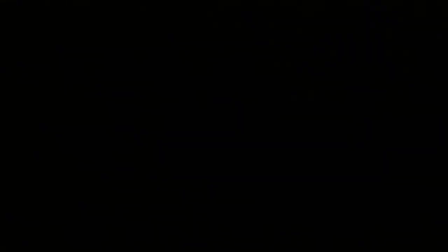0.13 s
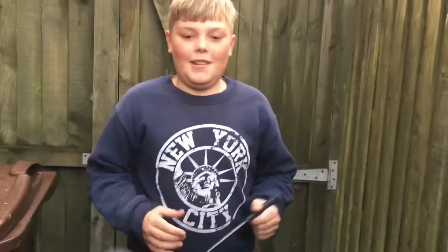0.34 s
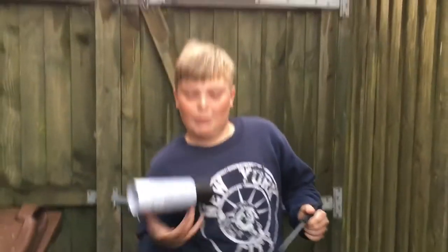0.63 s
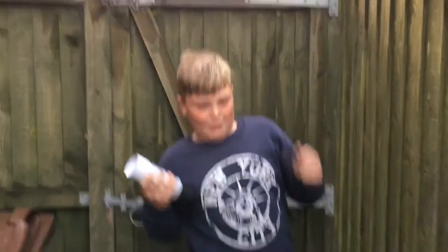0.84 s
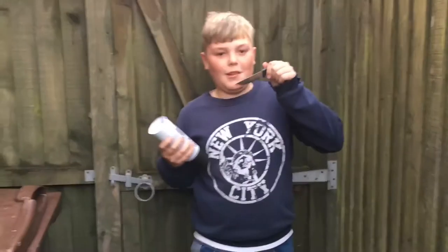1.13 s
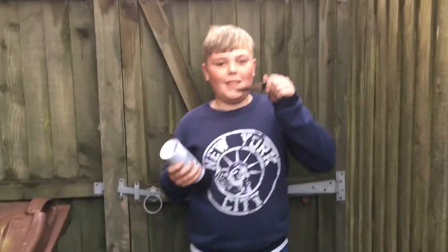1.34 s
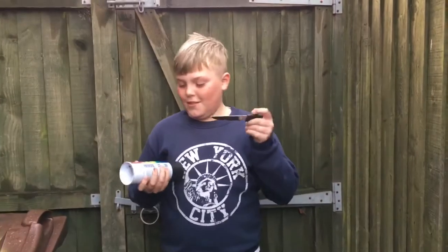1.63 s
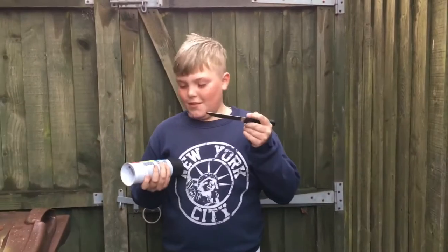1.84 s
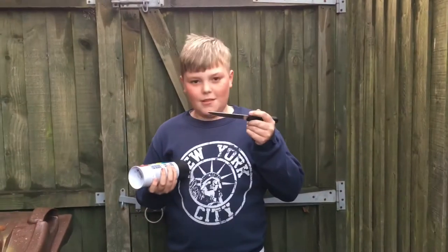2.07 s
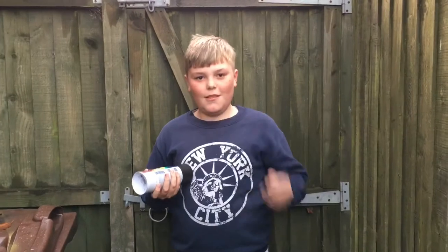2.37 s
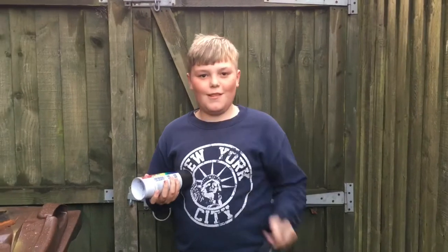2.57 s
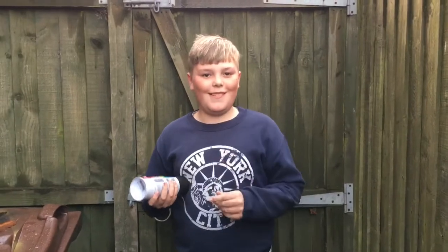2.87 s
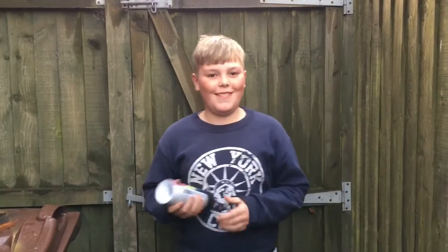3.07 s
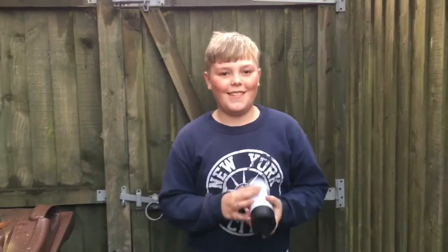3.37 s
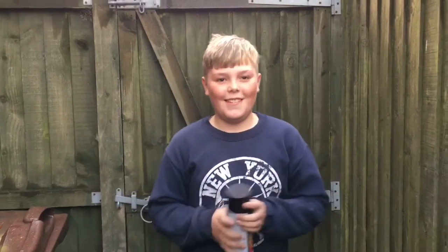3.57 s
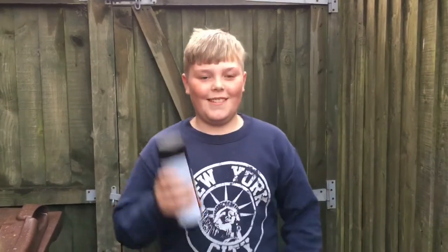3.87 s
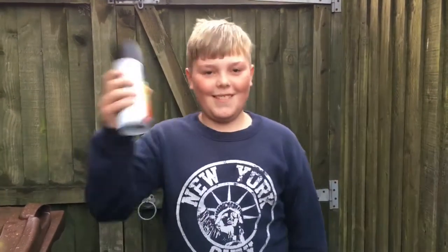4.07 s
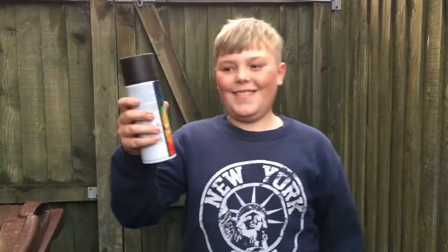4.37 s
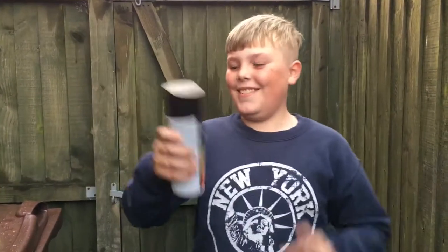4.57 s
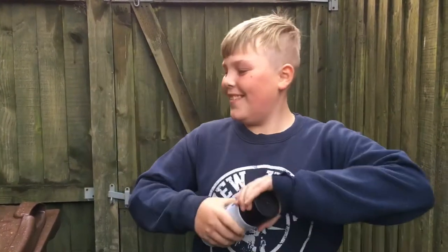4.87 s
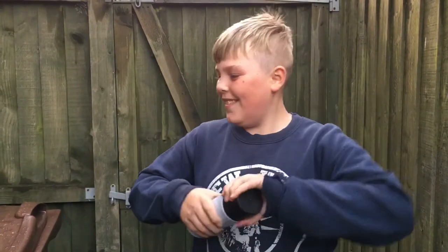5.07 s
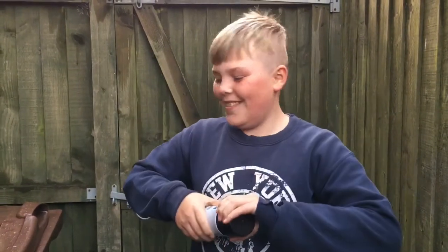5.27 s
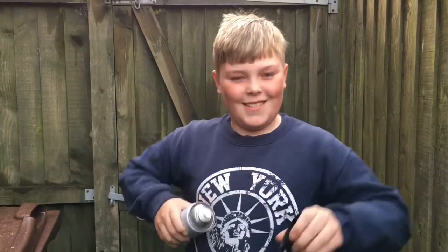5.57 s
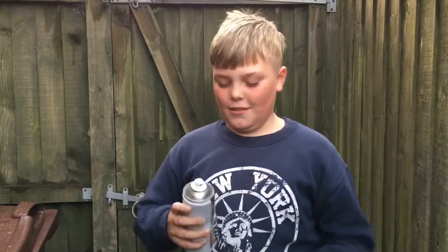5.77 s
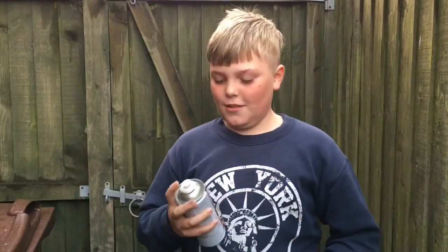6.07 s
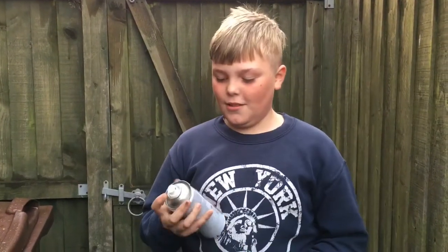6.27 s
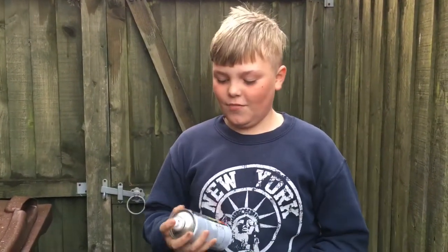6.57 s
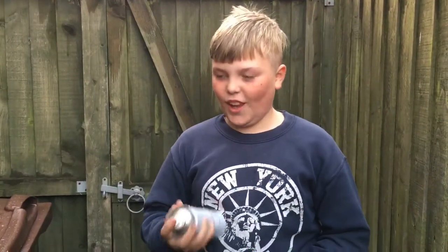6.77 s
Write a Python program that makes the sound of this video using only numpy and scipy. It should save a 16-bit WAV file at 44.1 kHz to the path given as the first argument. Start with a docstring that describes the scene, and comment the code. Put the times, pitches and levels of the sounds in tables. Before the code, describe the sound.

A soft thump on the microphone and faint hiss open, then a steel spray can clacks sharply close by and settles to small ticks. After a quiet gap with wind thuds, a hollow knock rings and the can is shaken briskly, its ball rattling brightly. The rattle thins, the plastic cap pops off, a few more metallic clicks follow, and low wind buffets the microphone in a fenced yard with distant tyre wash.

```python
"""Spray can shaken in a fenced yard

Close to the microphone, a mixing ball clacks, rolls and rustles in a steel can: cracks and tiny ticks excite its rings.
Something hollow is knocked close by and later the plastic cap pops off, each a crack with its own decaying modes.
The microphone is bumped at the start; then wind buffets it with swells of low noise.
Farther off, shaped noise makes a faint wash of air and distant tyres, under a fading hiss."""
import sys
import numpy as np
from scipy import signal
from scipy.fft import rfft, irfft, next_fast_len
from scipy.io import wavfile

SR = 44100
rng = np.random.default_rng(int(sys.argv[2]) if len(sys.argv) > 2 else 0)


def to_wav(s):
    """Save 16-bit WAV."""
    ch = np.atleast_2d(s).T  # columns
    pcm = np.round(np.clip(ch, -1, 1) * 32767)  # PCM
    wavfile.write(sys.argv[1], SR, pcm.astype(np.int16))


N = 304545
TIME = np.arange(N) / SR

# Tables of blows share these columns: t/s, level/dB before the object's tone, favoured f/Hz,
# tail against crack/dB, body/dB. Tables of modes: f/Hz, level/dB, t60/s before the common fade.
# Bodies: f/Hz, width/Hz, level/dB. Tones, one row per band: level/dB, share of the body dB.

# single clacks and ticks of the ball, loud and faint; the body is high on the thin side wall,
# low on the ends (blow columns)
CLACKS = [(0.387, -43, 3880, -1, -8.5), (0.4477, -51.5, 2360, 7, 2.5), (0.5378, -56.5, 2270, -2, 5.5),
          (0.6042, -53.5, 2420, 4, -0.5), (0.7168, -37, 3830, -6, -4.5), (0.7472, -21, 4410, -1, -9),
          (0.766, -35, 4480, 0, -13), (0.7761, -32, 5940, 3, -16), (0.8008, -33, 3970, 4, -14),
          (0.8115, -38, 4030, -12, -8), (0.9101, -37.5, 5850, -2, -9.5), (0.9449, -39, 4360, -3, -11),
          (0.9597, -41.5, 4300, -5, -3), (0.973, -34, 4370, -3.5, -11.5), (0.9948, -41.5, 5740, 5, -3),
          (1.0623, -48, 2100, 3, 2.5), (1.1235, -47, 3820, 3, -2), (1.1546, -41.5, 10600, 2, -4.5),
          (1.2102, -43, 4000, -4, -3.5), (1.2367, -44, 3940, -10, -6.5), (1.4128, -47, 3850, 0, -2.5),
          (1.541, -39, 4570, 3, -6), (1.619, -49.5, 3980, -3, -6), (2.831, -46, 9840, 2, -7),
          (2.8653, -47.5, 4260, 2, -7), (3.0359, -54.5, 4100, 7, -12), (3.134, -45.5, 4340, 9, -11),
          (3.4138, -46.5, 4000, 0, 3.5), (3.514, -41, 7000, 5, 5.5), (3.532, -35.5, 4225, -1.5, 2),
          (3.6154, -47.5, 4100, 15, 4.5), (3.6971, -27.5, 12400, -4, -6.5), (3.7495, -26, 11500, -5, -5),
          (3.8125, -33.5, 3930, -2.5, -6.5), (3.8715, -28.5, 7000, -3.5, -9), (3.9014, -22, 7550, -4, -10),
          (3.946, -35, 7140, -5, -11), (3.9898, -39.5, 3970, -3, -10), (4.023, -31.5, 3970, -4.5, -9.5),
          (4.106, -33.5, 2050, 6, 2.5), (4.1507, -44, 1640, -2, 3.5), (4.1939, -26, 4020, -3, -1.5),
          (4.2219, -26, 5820, -4.5, -10), (4.276, -35.5, 1680, 2, 2.5), (4.3142, -37.5, 1790, -4, 4),
          (4.3659, -45.5, 1740, -2, 1), (4.4207, -31, 1690, -2.5, 1), (4.4581, -29, 2520, -6, -2),
          (4.5314, -41.5, 1750, -2, -2.5), (4.5774, -38, 1780, -1, -1.5), (4.6725, -41, 7200, -4, -3),
          (4.7048, -40, 2550, 1, 0), (4.7741, -41.5, 2430, -9, 1), (4.79, -45.5, 2490, -14, 4),
          (4.811, -38.5, 7110, -3, -2.5), (4.851, -44.5, 1810, 1, 3.5), (4.8961, -39, 4550, -4, -2.5),
          (4.935, -42.5, 4560, -5, -5), (4.9817, -43, 4450, -7, -6), (5.0391, -47, 6900, 2, -4),
          (5.3287, -53.5, 2365, 0, 1), (5.491, -49.5, 2270, 0, 2), (5.517, -48.5, 1830, -5, -1),
          (5.598, -30, 7050, 4, -8.5), (5.6854, -35.5, 3922, 1.5, -4.5), (5.7898, -37.5, 7120, -9, -15)]
# short random rattles of the loose ball: start t/s, end t/s, mean level/dB before tone, body/dB
RATTLES = [(0.822, .86, -42, -5), (1.252, 1.29, -46.5, -8), (3.777, 3.8, -57, 7), (4.382, 4.41, -44.5, 0),
           (4.587, 4.65, -47.5, -7), (4.718, 4.76, -42, 1)]
# rolling, scraping and soft rustling at the can:
# t/s, length/s, level/dB before tone, ring of the shell/dB, body/dB
ROLLS = [(0.699, 0.1, -40.5, -19, -7), (.755, 0.12, -45, -27, -9), (0.938, 0.13, -49.5, -20, -0.5),
         (1.201, 0.12, -51, -21, -2), (1.443, 0.11, -58.5, -12, -4), (1.619, 0.16, -52, -25, -5),
         (2.625, .1, -61, -9, 7), (2.839, 0.091, -63.5, -3, -4), (3.137, 0.095, -53, -17, -3),
         (3.202, .2, -55, -9, 0), (3.638, 0.034, -25.5, -29, -4.5), (3.699, 0.31, -57, -10, 5.5),
         (4.668, 0.12, -51, -3, -3), (4.741, 0.071, -45, -2, -2), (4.841, 0.184, -56.5, -6, -1),
         (5.671, 0.039, -38.5, 5, -19), (5.707, 0.2, -47.5, 2, -11.5), (5.799, 0.17, -56.5, 3, -11),
         (5.899, 0.37, -60.5, 2, -4), (6.778, .1, -65, -7, -5)]
# edges of the can's tone bands: f/Hz
CAN_BANDS_HZ = [600, 1400, 3000, 8000, 16000]
# tone of the can (tone columns)
CAN_TONE = [(-9.5, 1.46), (-0.5, 1), (-1.5, 0), (-6.5, 0)]
# broad resonances of the can (body columns)
CAN_BODY = [(960, 132, 9), (1670, 130, 0), (2374, 570, 4.5), (3880, 1300, 6), (5940, 1400, 4),
            (7090, 510, 1.5), (10400, 600, -7.5), (11500, 1300, 2), (13000, 390, -10)]
# longer rings of the shell (mode columns)
CAN_MODES = [(1700, 1, 0.041), (1856, -5, 0.18), (2329, -5.5, 0.12), (4000, -20, 0.091),
             (4120, -7.5, 0.062), (4330, -4.5, 0.022), (7100, -9, .035)]
# level of the can's treble over time: t/s, level/dB
TREBLE = [(.4, 3), (.72, -2), (.95, -7), (1.15, 1.5), (1.45, -3), (3.1, 2.5), (3.65, 3.5), (4.0, -2),
          (4.2, 1), (4.9, -2), (5.6, -0.5), (5.8, -4)]

# edges of the tone bands of knock and cap: f/Hz
BLOW_BANDS_HZ = [130, 700, 1400, 3000, 8000, 16000]
# a hollow thing is tapped, then struck and settles (blow columns)
KNOCKS = [(1.3475, -49, 850, -3, 5.5), (3.4283, -17.5, 2045, 3, -2.5), (3.4362, -35, 574, 3, 16)]
# its tone (tone columns)
KNOCK_TONE = [(-0.5, 1.3), (-2, 0.85), (4.5, .5), (-3.5, .5), (-12, 0.5)]
# its broad resonances (body columns)
KNOCK_BODY = [(775, 190, -0.5), (2430, 470, 2.5), (2980, 240, -12.5)]
# rings of its hollow body (mode columns)
KNOCK_MODES = [(246, 5, 0.2), (281.7, -1, 0.29), (355, 1, 0.49), (400, 14, 0.3), (542, -13, 0.24),
               (590, -28, 0.11), (656, -3.5, 0.65), (929, 8, 0.38), (1120, 0.5, 0.48), (1333, 15, .25),
               (1900, -15, 0.62), (1943, 3.5, 0.18), (2033, -4.5, 0.37), (2210, 12, 0.19), (2365, -5, 0.4),
               (2600, -2.5, 0.59), (3270, 5, 0.96), (4300, 9, 0.42)]

# the cap snaps off the rim, then its cavity rings (blow columns)
POPS = [(5.4161, -16, 559, -5.5, 0.5), (5.4238, -25.5, 1190, -4.5, 14)]
# tone of the cap (tone columns)
CAP_TONE = [(0, 0), (-5, 1), (-16, 0.78), (-6.5, 0), (-14, 0.5)]
# broad resonances of the cap (body columns)
CAP_BODY = [(234, 130, 4), (430, 130, -2.5), (1370, 110, -7), (7800, 1700, 7), (10600, 660, -4),
            (13300, 4000, -4)]
# air and wall of the cap (mode columns)
CAP_MODES = [(322, -14, 0.076), (573, -9.5, 0.033), (630, -1.5, 0.036), (760, -16, 0.043), (966, -3, 0.12),
             (1100, 0, 0.054), (1580, -4, 0.041)]

# fingers bump the microphone (blow columns)
BUMPS = [(.0425, -27, 218, -28, 0), (.099, -46.5, 900, -17, 7), (.119, -54, 950, -34, 16.5),
         (.303, -56, 600, -29, 6)]
# edges of the housing's tone bands: f/Hz
BUMP_BANDS_HZ = [40, 150, 700, 1400, 3000, 8000]
# tone of the microphone housing (tone columns)
HOUSING_TONE = [(-5, 1), (-1.5, -0.5), (-6.5, 0.5), (-10.5, 0), (-26.5, 0)]
# broad resonances of the housing (body columns)
HOUSING_BODY = [(13000, 18000, -22), (1300, 250, -3.5)]
# ring of the housing (mode columns)
HOUSING_MODES = [(65, 0, 0.082)]

# single wind buffets, strong and weak:
# t/s, level/dB before the rumble gain, extra level of the upper (flap) band/dB
BUFFETS = [(2.024, -26, 3), (2.287, -31.5, -18), (2.79, -19, 0.5), (2.851, -17.5, -5.5), (2.887, -22, 11.5),
           (2.944, -19.5, 1.5), (3.002, -22.5, 8.5), (3.04, -25, 4), (3.185, -27, 1.5), (3.379, -28.5, 0.5),
           (3.645, -35, 12.5), (4.038, -34.5, 3), (4.426, -22.5, -1), (4.598, -29, 2.5), (5.062, -25, 3),
           (5.478, -22, -17), (5.712, -20, -1), (5.761, -22, 0.5), (6.434, -20.5, -0.5), (6.491, -20, 1),
           (6.599, -21.5, -2.5), (6.631, -21.5, 14.5), (6.688, -31, 17.5), (6.73, -32.5, 28.5),
           (6.776, -25.5, -1), (6.798, -24, 9.5), (6.822, -21, -1)]
# gusts reach the microphone: start t/s, length/s, level/dB before the eddy and rumble gains
GUSTS = [(1.895, 0.093, -40), (2.16, .2, -46.5), (2.781, .25, -28), (3.081, 0.1, -39.5), (4.42, .23, -41),
         (5.027, 0.11, -34), (5.239, .26, -29), (5.649, 0.15, -26), (5.824, 0.1, -34.5),
         (6.419, 0.1, -33.5), (6.584, 0.29, -31)]
# edges of the rumble and flap bands of an eddy: f/Hz
WIND_BANDS_HZ = [25, 250, 900]
# colour of an eddy ahead of its band levels: f/Hz, relative level/dB per Hz
EDDY = [(15, -19), (35, -8.5), (60, -5.5), (140, -3.5), (250, -7.5), (500, -23), (750, -34.5), (1200, -58),
        (2500, -67), (16000, -125)]
# light breeze between the gusts, ahead of its fade-in: t/s, level/dB
BREEZE = [(.4, -66), (.52, -48.5), (2.1, -47.5), (2.7, -49.5), (3.2, -38.5), (4.45, -53), (4.7, -42.5),
          (5.0, -53), (5.3, -36), (5.8, -32.5), (5.99, -51.5), (6.3, -41.5), (6.9, -30)]
# colour of breeze and gusts: f/Hz, relative level/dB per Hz
BREEZE_COLOUR = [(15, -33.5), (35, 0.5), (60, 4.5), (110, -5), (200, -16.5), (400, -32.5), (1000, -70.5)]

# echoes between fence and house: f/Hz, t60/s
YARD_T60 = [(200, 0.24), (1000, 0.23), (2100, 0.24), (4000, 0.15), (8000, 0.14), (15000, 0.13)]
# colour of the outdoor background: f/Hz, relative level/dB per Hz
AIR = [(59, -35.5), (100, -1.5), (335, -5.5), (634, -14), (1520, -12.5), (2080, -17), (2320, -20),
       (2470, -23), (2750, -36), (3050, -28), (3540, -34.5), (4020, -31), (5650, -40), (6560, -56),
       (16000, -60)]
# its level: t/s, level/dB
AIR_LEVEL = [(0, -56.5), (.08, -68), (.16, -78), (.365, -75), (.385, -50), (1.5, -51.5), (2.5, -51.5),
             (3.3, -52), (5.2, -48.5), (6.2, -50), (6.9, -49)]
# tyres of a far car: t/s, level/dB
TYRES = [(0, -102), (.37, -102), (.5, -61.5), (4.5, -55), (5.2, -50.5), (5.9, -56), (6.25, -49), (6.5, -50),
         (6.9, -51)]
# their colour: f/Hz, relative level/dB per Hz
TYRE_COLOUR = [(200, -13.5), (700, -7), (1020, 0.5), (1400, -11), (2500, -16), (5000, -26), (10000, -29.5),
               (16000, -38)]
# hiss of the microphone, louder at first: t/s, level/dB
HISS_LEVEL = [(0, -64.5), (.33, -64), (.37, -68.5), (6.9, -81)]
# its colour: f/Hz, relative level/dB per Hz
HISS = [(100, 20), (400, 10), (2000, 2.5), (6000, -0.5), (12000, 1), (16000, -6)]

BLOW_S, LEVEL_S = .24, .02   # length of a blow and its tail; span over which its level is set
RING_FADE_S = .11   # every ring fades out within about this time
RATTLE_GAP_S, RATTLE_SPREAD_DB, RATTLE_TAIL_DB = .04, 1.5, 2.5
RATTLE_LOW_HZ, RATTLE_HIGH_HZ = 1850, 5800   # range of the resonances that rattles favour
TREBLE_HZ = 8000
GUST_ATTACK_S, GUST_RELEASE_S, GUST_RUMBLE_DB = 0.0092, 0.041, -4
EDDY_GAP_S, EDDY_SPREAD_DB, EDDY_DB = .04, 4.5, -1   # small eddies in a gust, against its level
FLAP_AT_FULL_SCALE_DB, FLAP_GROWTH = 1, 1.679   # the flap band grows faster than the rumble (dB per dB)
CUTOFF_HZ = 16000


def ball_clacks():
    """Single clacks and ticks, loud and faint, and short random rattles crack and ring the shell."""
    return blows(list(CLACKS) + rattle_clacks(), CAN_BANDS_HZ, CAN_TONE, CAN_MODES, CAN_BODY,
                 favour_db=10.5, favour_q=9.5, scatter_db=3.5, crack_s=0.001, ring_db=-14.0,
                 echo_s=0.0098, echo_db=-8.0, resonance_spread=0.021)


def rattle_clacks():
    """Random touches of the loose ball, each at a new point of the wall; rows as in CLACKS."""
    rows = []
    for start, end, db, body_db in RATTLES:
        for s, size, point in loose_beat(start, end, RATTLE_GAP_S):
            hz = RATTLE_LOW_HZ * (RATTLE_HIGH_HZ / RATTLE_LOW_HZ) ** point
            rows.append((s, db + RATTLE_SPREAD_DB * size, hz, RATTLE_TAIL_DB, body_db))
    return rows


def rolls_and_rustles(ticks_per_s, spread_db, wet_db):
    """Rolling, scraping and rustling are dense runs of tiny contacts that keep the shell ringing."""
    out = np.zeros(N)
    for (s, length, level_db, ring_db, body_db), tail in zip(ROLLS, yard_tails(len(ROLLS))):
        n = int(length * SR)
        chance = rng.random((3, SR))[:, :n]
        # many small contacts, a few stronger ones, of either sign
        sizes = from_db(spread_db * np.minimum(-np.log(1 - chance[0]), 3)) * np.sign(chance[1] - .5)
        ticks = sizes * (chance[2] < ticks_per_s / SR) * signal.windows.tukey(n, .5)
        ring = from_db(ring_db) * shell(CAN_MODES, TIME[:len(tail)], 0.91)
        x = signal.fftconvolve(ticks, from_db(wet_db) * unit(tail) + ring)
        x[:n] += ticks
        x = through(x, CAN_BODY, CAN_BANDS_HZ[0])
        band_db = band_levels(CAN_TONE, level_db, body_db)
        add(out, s, voiced(x, CAN_BANDS_HZ, band_db, length, length))
    return out


def can_treble(x):
    """The can sounds brighter or duller over time, as its treble is raised or lowered."""
    hz = np.arange(N // 2 + 1) * SR / N
    treble = irfft(rfft(x) * (1 - 1 / (1 + (hz / TREBLE_HZ) ** 12)), N)
    return x + (level(TREBLE) - 1) * treble


def hollow_knock():
    """A blow close by drives the many modes of a hollow body."""
    return blows(KNOCKS, BLOW_BANDS_HZ, KNOCK_TONE, KNOCK_MODES, KNOCK_BODY,
                 favour_db=10.0, favour_q=6.8, scatter_db=7.5, crack_s=0.0056, ring_db=-10.0,
                 echo_s=0.0041, echo_db=-13.0)


def cap_pop():
    """The plastic cap snaps free, and its air and wall ring briefly."""
    return blows(POPS, BLOW_BANDS_HZ, CAP_TONE, CAP_MODES, CAP_BODY,
                 favour_db=5.5, favour_q=4.5, scatter_db=2, crack_s=0.0012, ring_db=-1.5,
                 echo_s=.004, echo_db=0.5)


def microphone_bumps():
    """Fingers thump the microphone, and its housing answers with one low mode."""
    return blows(BUMPS, BUMP_BANDS_HZ, HOUSING_TONE, HOUSING_MODES, HOUSING_BODY,
                 favour_db=1.0, favour_q=1.4, scatter_db=1.5, crack_s=0.0024, ring_db=-8.5,
                 echo_s=0.01, echo_db=0)


def wind_eddies(width_s, lead_s, rumble_db):
    """Each eddy is a brief swell of turbulent pressure; strong ones reach higher in pitch."""
    out, t = np.zeros(N), TIME[:int(BLOW_S * SR / 2)]
    centre = t.mean() / 2
    swell = np.exp(-.5 * ((t - centre) / width_s) ** 2)
    for s, level_db, flap_db in list(BUFFETS) + small_eddies():
        band_db = [level_db + rumble_db, FLAP_AT_FULL_SCALE_DB + FLAP_GROWTH * level_db + flap_db]
        eddy = coloured(rng.standard_normal(len(t)) * swell, lambda hz: at_hz(EDDY, hz))
        add(out, s - centre - lead_s, voiced(eddy, WIND_BANDS_HZ, band_db, t[-1], LEVEL_S))
    return out


def small_eddies():
    """Every gust carries a run of small eddies; rows as in BUFFETS."""
    return [(s, db + EDDY_DB + EDDY_SPREAD_DB * size, 0)
            for start, length, db in GUSTS
            for s, size, _ in loose_beat(start, start + length, EDDY_GAP_S)]


def breeze():
    """Low noise of moving air follows the breeze and the gusts."""
    fade_in = np.clip((TIME - .37) / .1, 0, 1)
    strength = level(BREEZE) + from_db(GUST_RUMBLE_DB) * gusting()
    return strength * fade_in * noise(BREEZE_COLOUR, N)


def gusting():
    """Gain over time of the gusts: each rises, holds and falls away."""
    gain = np.zeros(N)
    for s, length, db in GUSTS:
        corners = np.cumsum([s, GUST_ATTACK_S, max(length - GUST_ATTACK_S, 0), GUST_RELEASE_S])
        gain += from_db(db) * np.interp(TIME, corners, [0, 1, 1, 0])
    return gain


def outdoors():
    """Distant air and tyre noise are random pressures, each with its own colour and level over time."""
    return level(AIR_LEVEL) * noise(AIR, N) + level(TYRES) * noise(TYRE_COLOUR, N)


def microphone_hiss():
    """The microphone's own random noise, fading under the rest."""
    return level(HISS_LEVEL) * noise(HISS, N)


def blows(rows, edges, tone, modes, body, favour_db, favour_q, scatter_db, crack_s, ring_db,
          echo_s, echo_db, resonance_spread=0):
    """Each blow is a short crack with its first echo, then ringing modes and the yard's tail."""
    out, t = np.zeros(N), TIME[:int(BLOW_S * SR)]
    for (s, level_db, hz, tail_db, body_db), tail in zip(rows, yard_tails(len(rows))):
        crack = unit(rng.standard_normal(len(t)) * np.exp(-t / crack_s) * (1 - np.exp(-t / 0.00047)))
        delay_s = echo_s * (1 + rng.uniform(-0.34, 0.33))
        echo = from_db(echo_db) * np.interp(t - delay_s, t, crack, left=0)
        ring = from_db(ring_db) * shell(modes, t, scatter_db)
        x = crack + from_db(tail_db) * (unit(tail) + ring + echo)
        # strengths, and with resonance_spread also frequencies, vary at random from hit to hit
        driven = [(f * (1 + rng.normal(0, resonance_spread)), width, db + rng.normal(0, scatter_db))
                  for f, width, db in body]
        driven.append((hz, hz / favour_q, favour_db))   # the one favoured by the point of contact
        x = through(x, driven, edges[0])
        add(out, s, voiced(x, edges, band_levels(tone, level_db, body_db), LEVEL_S, LEVEL_S))
    return out


def shell(modes, t, scatter_db):
    """Decaying modes, with new strengths for every contact and a common fade; energy 1."""
    hz, mode_db, t60 = np.transpose(modes)
    decay = np.exp(-np.log(1000) * t / t60[:, None] - (t / RING_FADE_S) ** 2)
    sines = np.sin(2 * np.pi * hz[:, None] * t) * decay
    strengths = from_db(mode_db + rng.normal(0, scatter_db, len(hz))) * rng.choice([-1, 1], len(hz))
    return unit(strengths @ sines)


def through(x, body, low_hz):
    """A body radiates little below low_hz, favours its broad resonances and falls off at the very top."""
    def gain_db(hz):
        peaks = sum(db / (1 + (2 * (hz - f) / width) ** 2) for f, width, db in body)
        ends = (1 + (low_hz / (hz + 10)) ** 4) * (1 + (hz / 13800) ** 18)
        return peaks - 10 * np.log10(ends)
    return coloured(x, gain_db)


def band_levels(tone, level_db, body_db):
    """An object's tone at a given level, with body_db added to each band by its share."""
    db, share = np.transpose(tone)
    return level_db + db + share * body_db


def voiced(x, edges, band_db, span_s, over_s):
    """Tint x smoothly towards band levels for the energy of its first span_s, spread over over_s."""
    size = 8192
    for _ in range(2):   # the second pass refines the first
        head = x[:int(span_s * SR)]
        n = max(size, len(head))
        power = np.abs(rfft(head, n)) ** 2 * 2 / (n * over_s * SR)
        have = np.histogram(np.arange(len(power)) * SR / n, edges, weights=power)[0]
        change = np.asarray(band_db) - 10 * np.log10(have + 1e-20)
        centres = np.sqrt(np.multiply(edges[:-1], edges[1:]))
        x = coloured(x, lambda hz: at_hz(np.c_[centres, change], hz))
    return x


def yard_tails(count):
    """Diffuse echoes, different for each blow or roll; the treble dies first."""
    t = TIME[:int(BLOW_S * SR)]
    white = rfft(rng.standard_normal((count, len(t))))
    hz = np.arange(white.shape[1]) / BLOW_S
    edges = np.r_[0, np.geomspace(500, SR / 2, 8)]
    tails = 0
    for low, high in zip(edges, edges[1:]):
        fade = np.exp(-np.log(1000) * t / at_hz(YARD_T60, (low + high) / 2))
        tails = tails + irfft(white * ((hz >= low) & (hz < high)), len(t)) * fade
    return tails * (1 - np.exp(-t / 0.00038))


def loose_beat(start, end, gap_s):
    """Uneven moments about gap_s apart, each with a chance value (spread 1) and a position (0-1)."""
    chance = rng.random((40, 2))
    size = rng.standard_normal(40)
    s = start + gap_s * (np.arange(40) + chance[:, 0])
    return np.c_[s, size, chance[:, 1]][s < end]


def noise(colour, size):
    """Noise of a given spectrum, rms 1."""
    return rms_one(coloured(rng.standard_normal(size), lambda hz: at_hz(colour, hz)))


def coloured(x, db_at):
    """Causal (minimum-phase) filter whose gain in dB is db_at(Hz)."""
    n = 2 * next_fast_len(len(x))
    cepstrum = irfft(np.log(from_db(db_at(np.arange(n // 2 + 1) * SR / n))), n)
    # folding the cepstrum onto positive time makes the phase minimal
    cepstrum[1:n // 2] *= 2
    cepstrum[n // 2 + 1:] = 0
    return irfft(rfft(x, n) * np.exp(rfft(cepstrum)), n)[:len(x)]


def at_hz(points, hz):
    """Read a table on a log-frequency axis."""
    f, value = np.transpose(points)
    return np.interp(np.log(hz + 1), np.log(f), value)


def level(rows):
    """Gain over time from (t/s, level/dB) rows."""
    return from_db(np.interp(TIME, *np.transpose(rows)))


def from_db(db):
    """Decibels to gain."""
    return 10 ** (np.asarray(db) / 20)


def rms_one(x):
    """Scale to rms 1."""
    return x / np.sqrt(np.mean(x ** 2) + 1e-20)


def unit(x):
    """Scale to energy 1."""
    return x / np.sqrt(np.sum(x ** 2) + 1e-20)


def add(out, s, x):
    """Mix x in at time s."""
    i = max(round(s * SR), 0)
    out[i:i + len(x)] += x[:max(N - i, 0)]


def scene():
    """Can, knock and cap in front of the fence; wind and handling at the microphone."""
    can = can_treble(ball_clacks() + rolls_and_rustles(ticks_per_s=1700, spread_db=3, wet_db=-4.5))
    close_by = hollow_knock() + cap_pop()
    wind = wind_eddies(width_s=0.0086, lead_s=0.00179, rumble_db=2.5) + breeze()
    at_microphone = microphone_bumps() + wind + microphone_hiss()
    return (can + close_by + at_microphone + outdoors())[None]


def record(dry):
    """The deepest rumble is filtered out, the highest peaks are clipped and the top is cut."""
    bass = signal.butter(5, 36, "high", fs=SR, output="sos")
    top = signal.ellip(10, .1, 80, CUTOFF_HZ, fs=SR, output="sos")
    clipped = np.clip(signal.sosfilt(bass, dry), -1, 1)
    return signal.sosfilt(top, clipped)


dry = scene()
out = record(dry)
to_wav(out)
```